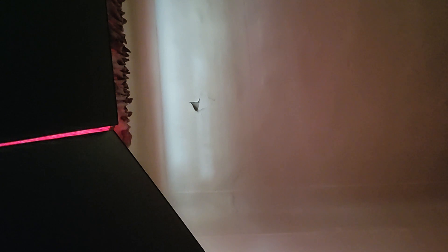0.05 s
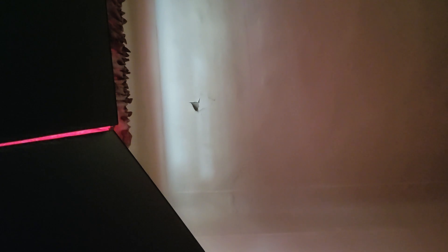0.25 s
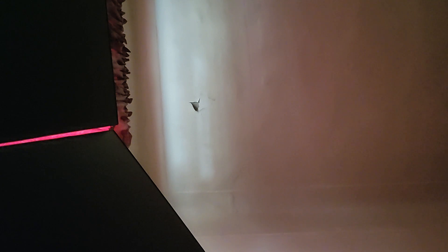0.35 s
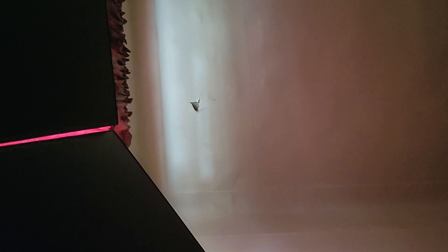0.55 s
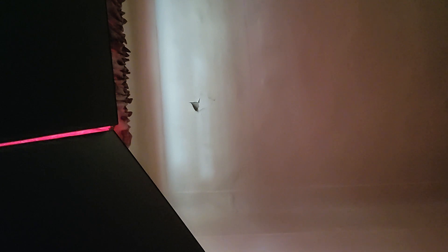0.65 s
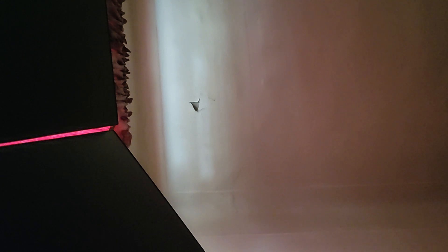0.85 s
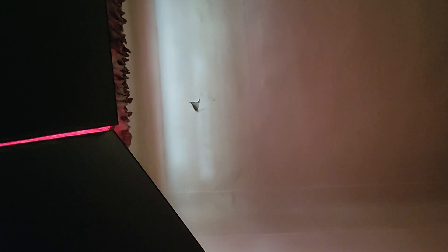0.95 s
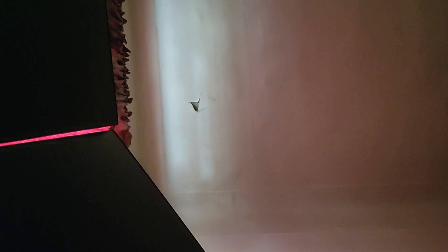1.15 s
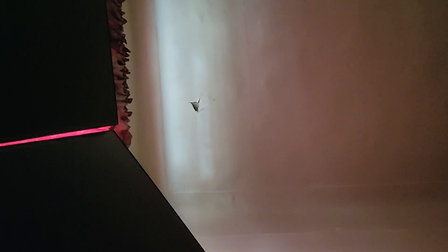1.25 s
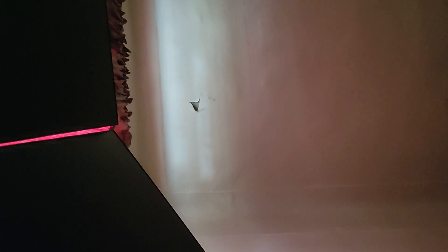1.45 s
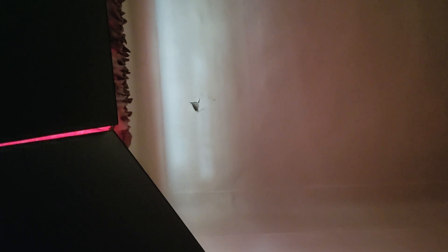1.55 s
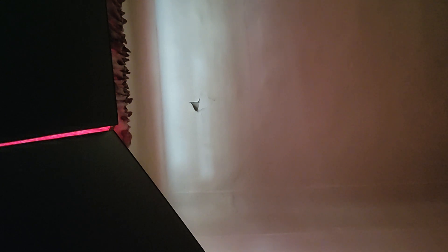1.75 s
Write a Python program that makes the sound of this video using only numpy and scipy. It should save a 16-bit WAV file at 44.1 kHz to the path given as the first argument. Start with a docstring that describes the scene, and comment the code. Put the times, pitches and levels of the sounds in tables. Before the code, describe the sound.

Muffled steps knock overhead in a quiet room, ending with one harder clack and bounce

```python
"""Steps overhead in a quiet room

Soft steps knock on the boards of an upper floor, as decaying modes, and the ceiling booms at low pitches.
One harder object clacks down and bounces: a burst of noise and a few modes, with a tail that dies band
by band, and knocks on the boards. Mains hum and a motor tone are sines; house rumble, microphone hiss and
faint treble ticks are shaped noise. Hum, motor, rumble and most of the hiss are stronger on the left."""
import sys
import numpy as np
from scipy import signal
from scipy.fft import rfft, irfft, next_fast_len
from scipy.io import wavfile
from scipy.ndimage import map_coordinates

SR = 44100
rng = np.random.default_rng(int(sys.argv[2]) if len(sys.argv) > 2 else 0)


def inscribe(sig):
    """Save sig as 16-bit PCM at rate SR to the path in sys.argv[1].

    A 1-D sig is mono; a 2-D sig holds one channel per row.
    Samples are clipped to [-1, 1] before scaling.
    """
    pcm = np.round(np.clip(np.atleast_2d(sig).T, -1, 1) * 32767)
    wavfile.write(sys.argv[1], SR, pcm.astype(np.int16))


def gain_from_db(level_db):
    """Convert decibel levels to linear amplitude factors (20 dB per decade)."""
    decades = np.asarray(level_db, float) / 20
    return 10 ** decades


N = 79380
T = np.arange(N) / SR  # s

# relative noise spectrum of the clack: frequency_hz, density_db
CLACK_SPECTRUM = [(300, -120), (500, -4.5), (750, -11.5), (950, -4.5), (1400, -8.5), (2000, -7),
                  (3000, -8.2), (4200, -12), (5500, -21.5), (7000, -38.5), (10000, -54), (15000, -72)]
# left-right balance of the clack: frequency_hz, left_minus_right_db
CLACK_BALANCE = [(500, 1), (1000, -2), (2000, -4), (4000, -6), (8000, 0.1)]
# left-right balance of hiss and ticks: frequency_hz, left_minus_right_db
HISS_BALANCE = [(1000, -8), (1900, 7.5), (3800, 13.5), (7500, 9), (15000, 10.5)]
CLACK_S, CLACK_RISE_S = 1.466, 0.004


def unit(x):
    """Normalisation: scale to rms 1."""
    return x / np.sqrt(np.mean(x ** 2) + 1e-20)


def along(points, hz):
    """Interpolation of (Hz, value) points on a logarithmic frequency axis."""
    f, value = np.transpose(points)
    return np.interp(np.log(hz + 1), np.log(f + 1), value)


def level_curve(points):
    """Gain over time from (s, dB) points, linear in decibels."""
    return gain_from_db(np.interp(T, *np.transpose(points)))


def sides(pan_db):
    """Level-difference stereo: left and right gains, half the difference each."""
    return gain_from_db(np.array([pan_db / 2, -pan_db / 2]))


def wobble(rate):
    """Random fluctuation: a smooth spline through random knots, rate knots a second."""
    return map_coordinates(rng.standard_normal(1000), [T * rate])


def filtered(x, response):
    """Linear filtering: multiply the spectrum of x by a response of frequency."""
    m = next_fast_len(N + 8192)
    return irfft(rfft(x, m) * response(np.fft.rfftfreq(m, 1 / SR)), m)[..., :N]


def rush(spectrum, pan, alike):
    """Partly coherent stereo noise: sum and difference of two noises, rms 1 before panning."""
    def mid_and_side(hz):
        turn = np.arccos(np.clip(along(alike, hz), -1, 1)) / 2  # likeness is cos(2 turn)
        return gain_from_db(along(spectrum, hz)) * np.array([np.cos(turn), np.sin(turn)])

    mid, side = filtered(rng.standard_normal((2, N)), mid_and_side)
    stereo = unit(np.array([mid + side, mid - side]))
    return filtered(stereo, lambda hz: sides(along(pan, hz)))


def swell_in(t, rise):
    """Smooth onset: a squared quarter sine lasting rise seconds."""
    return np.sin(np.pi / 2 * np.clip(t / rise, 0, 1)) ** 2


def shape(start, rise, t60, power=1):
    """Damped envelope: a smooth rise, then a fall of 60 dB in t60; power > 1 falls ever faster."""
    t = T - start
    return swell_in(t, rise) * gain_from_db(-60 * (np.clip(t - rise, 0, None) / t60) ** power)


def ceiling():
    """Low-frequency plate resonance: each boom swells at one pitch and dies sooner on the right."""
    # ceiling swings: peak_s, peak_db, pitch_hz, swell_s, left_t60_s, left_minus_right_db
    booms = [(0.207, -43.5, 72, 0.038, 0.11, 11.5), (0.263, -48.5, 59.8, 0.012, 0.44, 8),
             (0.333, -48.5, 64, 0.015, 0.43, 2), (.428, -33, 79, 0.024, 0.11, 8.5),
             (0.549, -40.5, 105.2, 0.036, 0.26, 8), (0.569, -31, 59.86, 0.034, 0.35, 3.5),
             (1.043, -49.5, 69, 0.033, .2, 13), (1.186, -41, 78.9, 0.046, .3, 11.5),
             (1.306, -32.5, 82.3, 0.052, 0.11, 7.5), (1.492, -37.5, 69, .025, 0.088, 11),
             (1.548, -48.5, 59.5, 0.09, 0.15, 15), (1.589, -56, 100, 0.021, 0.12, 11.5)]
    t60_ratio = np.array([[1], [0.7]])  # left, right
    out = np.zeros((2, N))
    for peak_s, db, hz, swell, t60, pan in booms:
        envelope = shape(peak_s - swell, swell, t60 * t60_ratio, 1.3)
        out += gain_from_db(db) * sides(pan)[:, None] * envelope * np.cos(2 * np.pi * hz * (T - peak_s))
    return out


def boards():
    """Modal excitation: each contact rings close modes, strongest near the pitch its spot favours."""
    # contacts on the boards: steps, then the clacking object landing at 1.469 s and bouncing twice:
    # start_s, relative_level_db, tilt_db_per_octave, favoured_hz, rise_s, decay_factor
    knocks = [(.24, -71, -6.5, 337, 0.053, 1.43), (0.377, -61.5, -4.3, 680, 0.0048, 0.99),
              (0.463, -70.5, -7, 265, 0.046, 1.82), (0.542, -53, 1, 546, .012, 0.86),
              (0.782, -69, 4.5, 263, 0.033, 0.76), (1.032, -74, -7.5, 335, 0.023, 0.84),
              (1.112, -76, 1, 508, .03, 1.5), (1.151, -61.5, -1.2, 700, 0.011, 0.96),
              (1.249, -53.5, -2, 708, 0.014, 1.1), (1.331, -66.5, -5.5, 512, 0.059, 0.66),
              (1.469, -50, 9.5, 318, 0.015, 0.46), (1.504, -58.5, 7.5, 299, 0.011, 0.62),
              (1.537, -62.5, -10.5, 263, 0.0059, 0.46)]
    # groups of board modes: centre_hz, relative_level_db, t60_s (before decay_factor), left_minus_right_db
    groups = [(37.04, -4.5, 0.19, 1), (100, -1, 0.083, -3), (134, 5, 0.28, 4.3), (182.3, 4, 0.33, -9),
              (266.84, 4, .3, -1.8), (323.3, 0.5, 0.14, 1.5), (401, -10, 0.4, -1),
              (471.4, -11.5, 0.21, 1.3), (540, -10, 0.2, 4), (616, -25, 0.15, 1.4), (700, -14, 0.15, -11.8),
              (801, -19, .16, 8.8), (1013, -26.5, 0.17, -10), (1198, -29.5, 0.16, 2.8)]
    modes_per_group, spread, scatter_db = 8, 0.05, 2  # spread: largest relative detuning
    favour_db, favour_octaves = 9, 0.12
    phase_scatter_rad = 0.3  # between the microphones
    out, t = np.zeros((2, N + SR)), T[:SR // 3]
    hz, level_db, t60, pan = np.repeat(groups, modes_per_group, axis=0).T[..., None]
    for start, db, tilt_db, favour_hz, rise, factor in knocks:
        pitch, turn, apart, size = rng.standard_normal((4, len(hz), 1))
        f = hz * (1 + spread * np.tanh(pitch))
        tilt = tilt_db * np.log2(np.maximum(f, 250) / 300)
        favour = favour_db * np.exp(-0.5 * (np.log2(hz / favour_hz) / favour_octaves) ** 2)
        gain = gain_from_db(db - 6.5 + level_db + tilt + scatter_db * size + favour)
        phase = phase_scatter_rad * apart * np.array([1, -1])[:, None, None]
        swing = np.sin(2 * np.pi * (f * t + turn) + phase)
        envelope = swell_in(t, rise) * gain_from_db(-60 * t / (factor * t60))
        first = round(start * SR)
        out[:, first:first + len(t)] += (sides(pan) * gain * envelope * swing).sum(1)
    return out[:, :N]


def clack_contact():
    """Impact noise: a faint scuff leads into a hard contact whose level is rough."""
    lead_s, t60_s, grain_db = 0.025, 0.15, 2.5
    scuff = gain_from_db(-19) * shape(CLACK_S - lead_s, lead_s, 0.033)
    stroke = shape(CLACK_S, CLACK_RISE_S, t60_s) + scuff
    noise = rush(CLACK_SPECTRUM, CLACK_BALANCE, [(500, 0.067)])
    return noise * stroke * gain_from_db(grain_db * wobble(250))


def clack_ring():
    """Free vibration: damped sines whose phase differs between the microphones more at high pitch."""
    # modes of the clack: pitch_hz, relative_level_db, t60_s
    modes = [(313.6, 1.5, .12), (351, 6.5, 0.063), (935, -6.5, 0.14), (1192, -15.5, 0.14),
             (1301, -10, 0.27), (2085, -13.5, 0.26), (2335, -27, 0.032), (2980, 3, 0.055)]
    alike_below_hz = 900  # the phases differ by up to a full turn from here up
    out = np.zeros((2, N))
    for f, db, t60 in modes:
        apart = min(f / alike_below_hz, 1) ** 2 * rng.random((2, 1))
        swing = np.sin(2 * np.pi * (f * T + rng.random() + apart))
        gain = gain_from_db(db) * sides(along(CLACK_BALANCE, f))[:, None]
        out += gain * shape(CLACK_S, 2 * CLACK_RISE_S, t60) * swing
    return out


def clack_tail():
    """Reverberation: diffuse noise in which every frequency band decays at its own rate."""
    # reverberation time of the room: frequency_hz, t60_s
    room = [(500, 0.33), (1400, 0.23), (3700, 0.28), (8000, 0.44)]
    noise = rush(CLACK_SPECTRUM, CLACK_BALANCE, [(500, 0.087)])
    hz, t, bands = signal.stft(noise, SR, nperseg=256)
    fall = gain_from_db(-60 * np.clip(t - CLACK_S, 0, None) / along(room, hz)[:, None])
    tail = signal.istft(bands * fall, SR, nperseg=256)[1][:, :N]
    return gain_from_db(-0.5) * tail * shape(CLACK_S, 0.013, 99)  # t60 of 99 s: in effect the bands set the decay


def clack():
    """Superposition of contact, ringing modes and the reverberant tail."""
    return gain_from_db(-51.5) * (clack_contact() + clack_ring() + clack_tail())


def mains_hum():
    """Harmonic series: steady sines at odd multiples of the mains frequency."""
    # mains harmonics: multiple, relative_level_db
    harmonics = [(1, -59), (3, -72), (5, -85), (7, -96.5), (9, -93), (11, -100), (13, -102)]
    mains_hz, pan_db = 59.99, 13.5
    hum = np.zeros(N)
    for k, db in harmonics:
        hum += gain_from_db(db + 1.5) * np.sin(2 * np.pi * (k * mains_hz * T + rng.random()))
    return sides(pan_db)[:, None] * hum


def motor_tone():
    """Slow modulation: one sine that wavers slightly in level and phase."""
    motor_hz, level_db, waver_db, waver_rad, pan_db = 155.9, -64, 0.1, 0.5, 10.5
    gain = gain_from_db(level_db + waver_db * wobble(2))
    tone = gain * np.sin(2 * np.pi * motor_hz * T + waver_rad * wobble(4.1))
    return sides(pan_db)[:, None] * tone


def house_rumble():
    """Low-passed random noise with a set course of level and a random fluctuation."""
    # relative noise spectrum: frequency_hz, density_db
    spectrum = [(15, -6), (40, -1), (65, 1.4), (85, -5), (130, -12), (215, -19), (260, -25), (340, -22.5),
                (450, -37), (760, -40), (900, -45.5), (1300, -64), (2000, -120)]
    # balance: frequency_hz, left_minus_right_db
    balance = [(40, 9), (70, 4.1), (250, 15), (500, 3), (1000, 3.7)]
    # coherence of the channels: frequency_hz, likeness (1 = identical before panning)
    likeness = [(60, 0.2), (250, 1), (1000, 0.51)]
    # level over time, set by hand and higher around the steps, before the fluctuation: time_s, level_db
    course = [(0, -61.5), (.25, -61), (.5, -51), (.7, -58.5), (.85, -59.5), (1.0, -62), (1.25, -52.5),
              (1.45, -58), (1.6, -63), (1.8, -61)]
    fluctuation_db = 4
    return level_curve(course) * gain_from_db(fluctuation_db * wobble(8)) * rush(spectrum, balance, likeness)


def microphone_hiss():
    """Coloured random noise, nearly incoherent between the channels, fluctuating slightly."""
    # relative noise spectrum: frequency_hz, density_db
    spectrum = [(590, -43), (1000, -13.5), (1230, -9.5), (1880, 1.5), (2130, -5), (2360, -4), (2740, -4),
                (4810, -2.5), (6480, -14), (8430, -21.5), (11500, -21), (12700, -9), (15500, -20)]
    steep_foot = [(700, -120)] + list(spectrum[1:])  # takes the place of the first row
    likeness = [(1000, 0.2), (4000, 0.017), (15000, 0.2)]
    return gain_from_db(-82 + 0.82 * wobble(9.8)) * rush(steep_foot, HISS_BALANCE, likeness)


def treble_ticks():
    """Poisson-like impulses: random short Gaussian gates open a noise of the top treble."""
    # relative noise spectrum: frequency_hz, density_db
    spectrum = [(6000, -120), (8500, -16), (11000, -3.5), (13000, -1.2), (15600, 1.5)]
    # level relative to the overall gain: time_s, level_db
    course = [(0, -5.5), (.3, -0.3), (.85, -3.5), (1.2, 2.5), (1.8, -0.5)]
    ticks_per_s, gain_db, width_s, spread_db = 130, -84, 0.002, 2
    hits = (rng.random(N) < ticks_per_s / SR) * gain_from_db(spread_db * rng.standard_normal(N))
    pulse = np.exp(-((np.arange(-400, 400) / SR) / width_s) ** 2)
    gate = signal.fftconvolve(hits, pulse, "same")
    return gain_from_db(gain_db) * level_curve(course) * gate * rush(spectrum, HISS_BALANCE, [(9000, 0.52)])


def scene():
    """Linear superposition of all sources at the microphones."""
    knocks_and_booms = ceiling() + boards()
    background = mains_hum() + motor_tone() + house_rumble() + microphone_hiss() + treble_ticks()
    return knocks_and_booms + clack() + background


def roll_off(x):
    """The treble ends steeply here."""
    return signal.sosfilt(signal.butter(12, 15620, fs=SR, output="sos"), x)


def record(dry):
    """Band limitation: an ideal low-pass removes everything from 15620 Hz up."""
    mix = filtered(dry, lambda hz: hz < 15620)
    return roll_off(mix)


dry = scene()
out = record(dry)
inscribe(out)
```